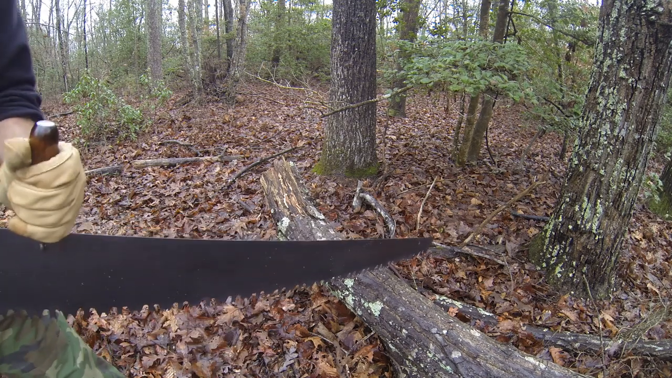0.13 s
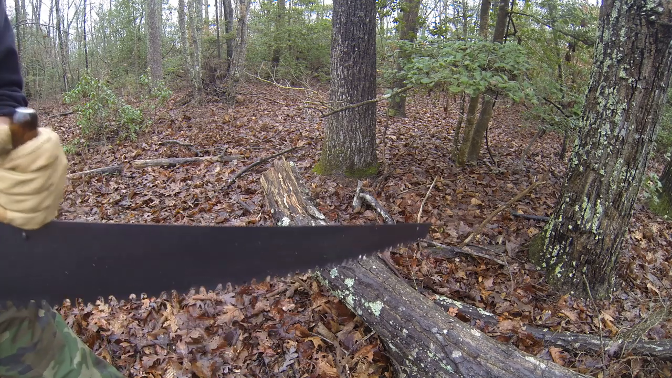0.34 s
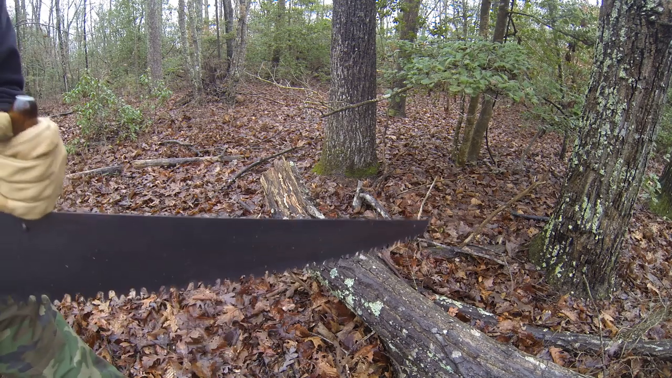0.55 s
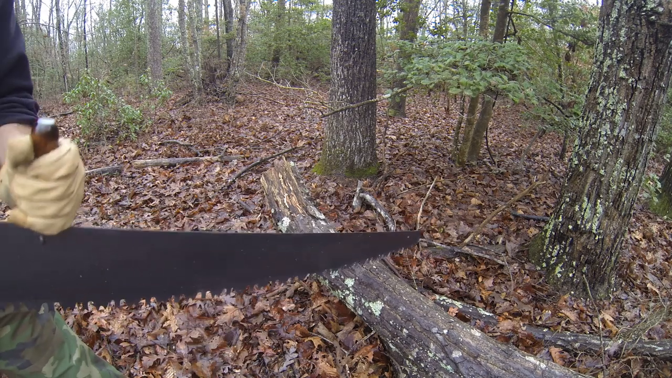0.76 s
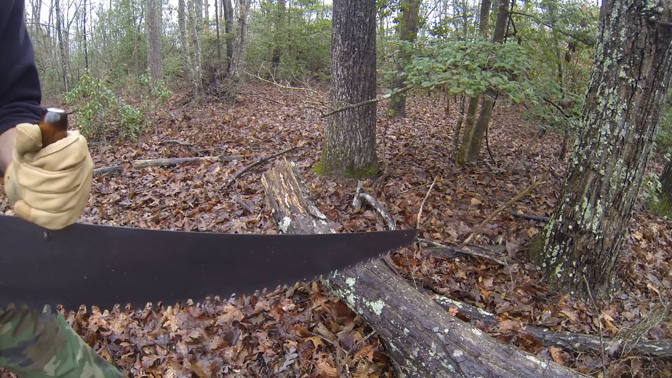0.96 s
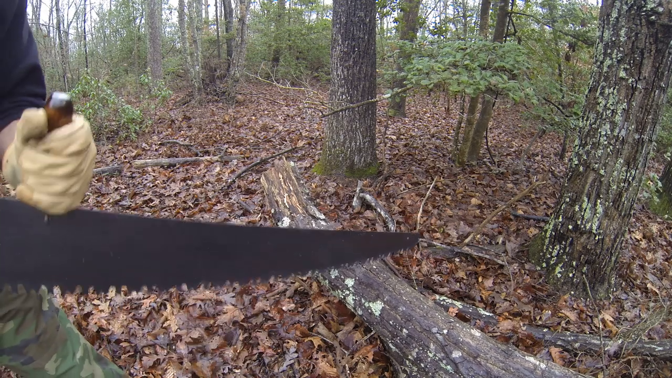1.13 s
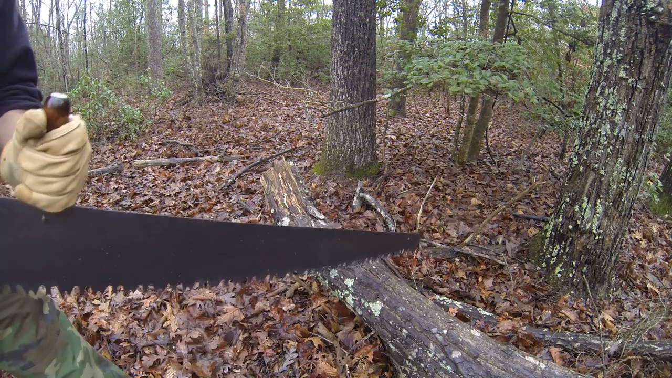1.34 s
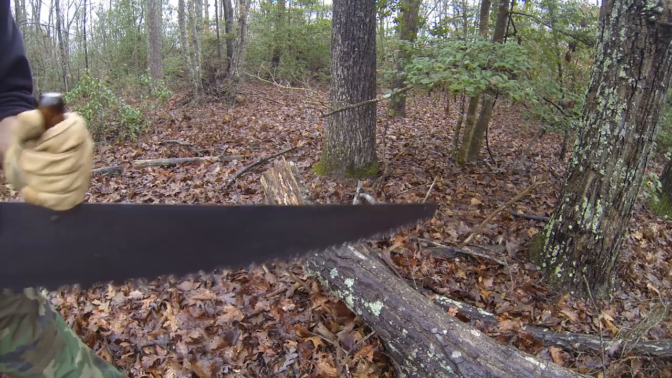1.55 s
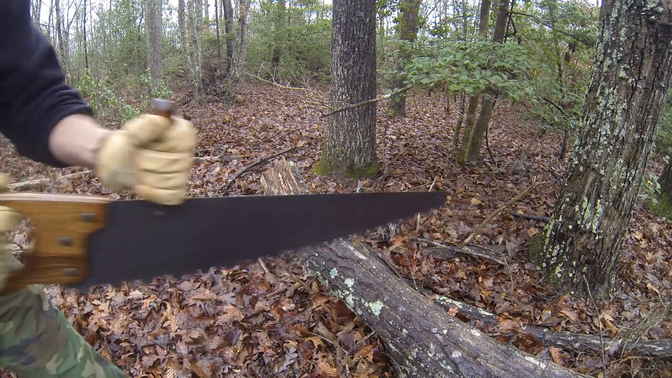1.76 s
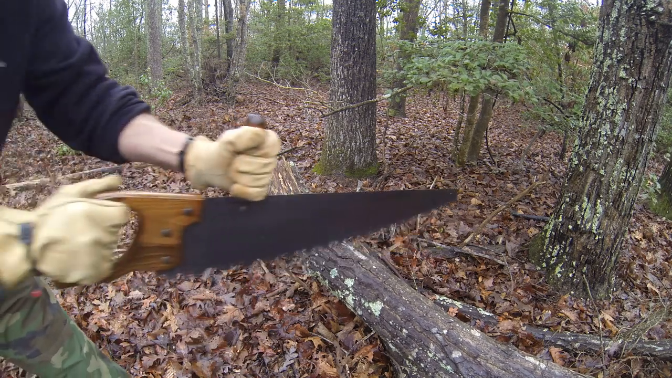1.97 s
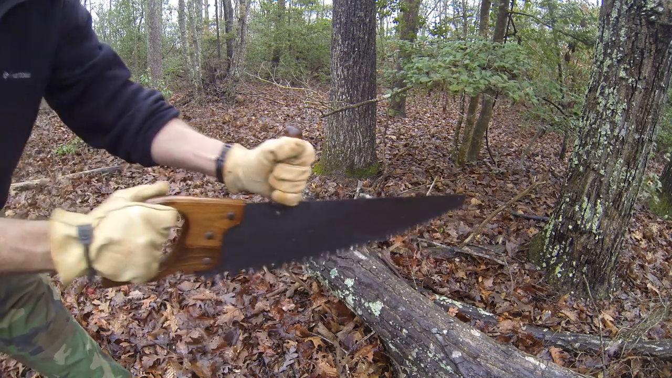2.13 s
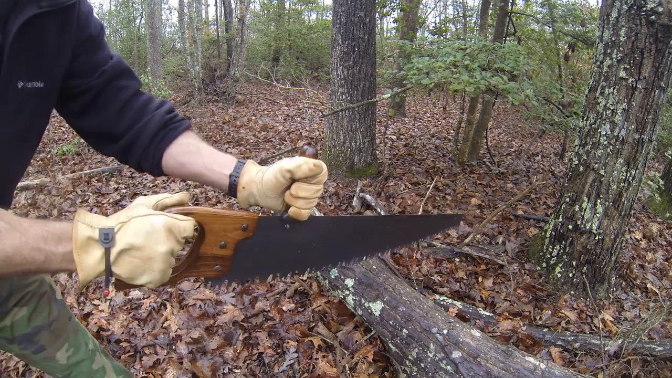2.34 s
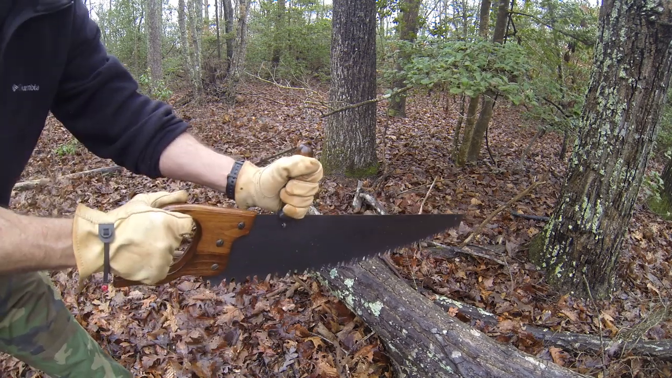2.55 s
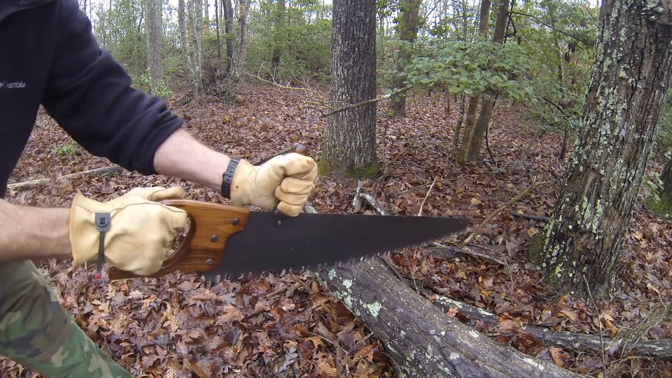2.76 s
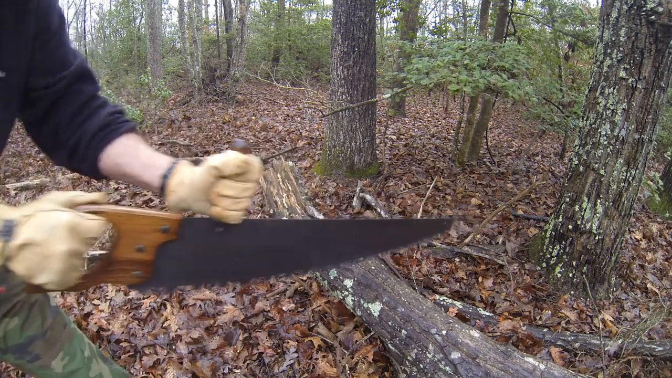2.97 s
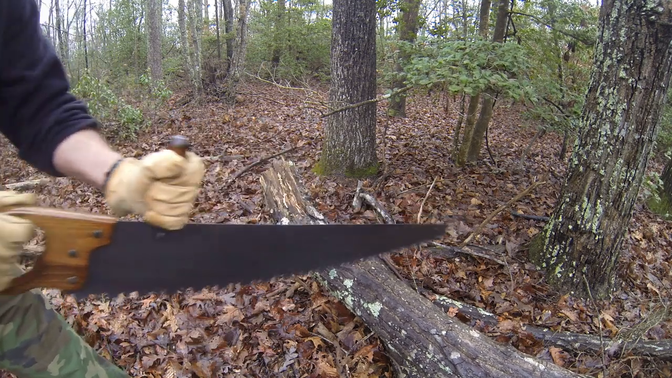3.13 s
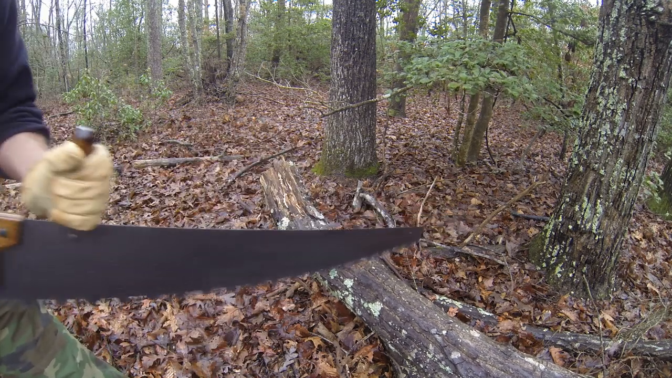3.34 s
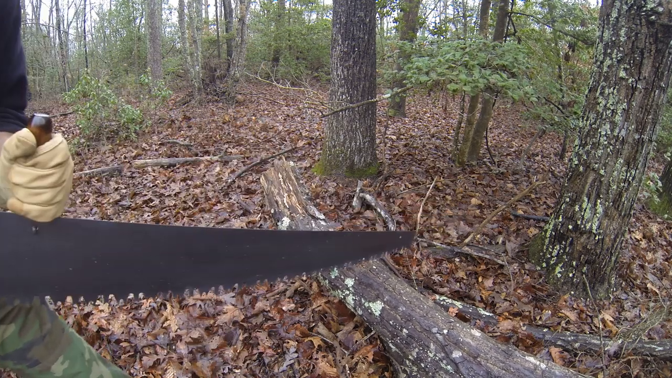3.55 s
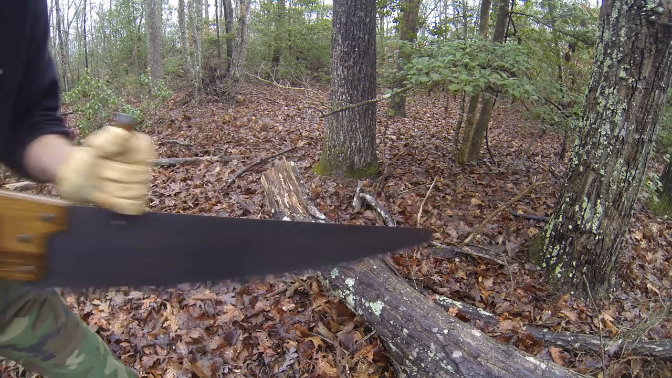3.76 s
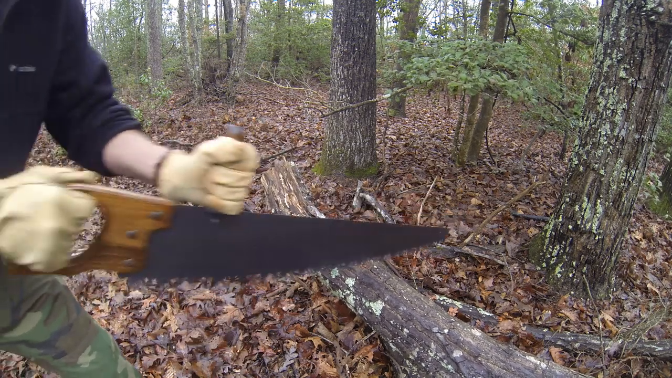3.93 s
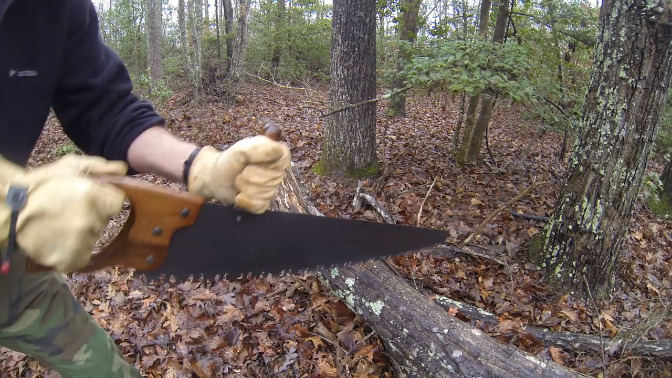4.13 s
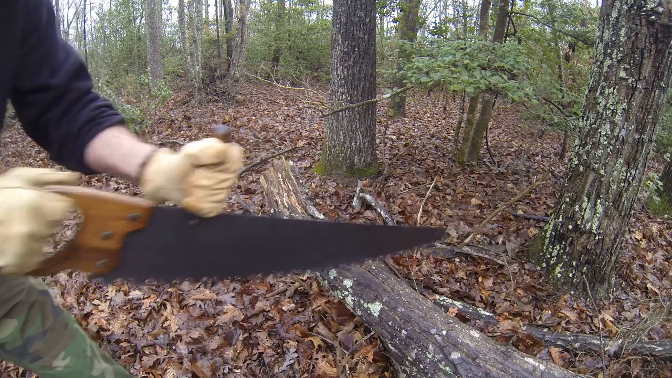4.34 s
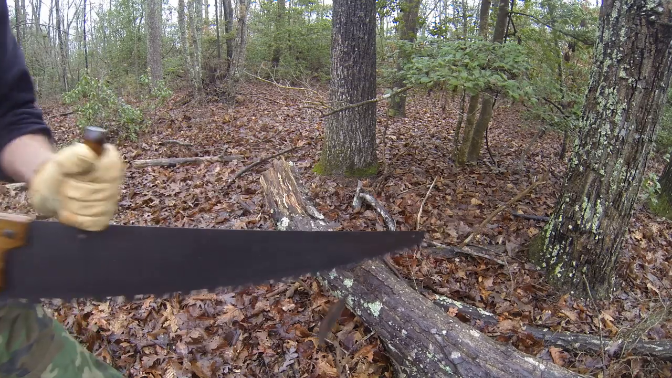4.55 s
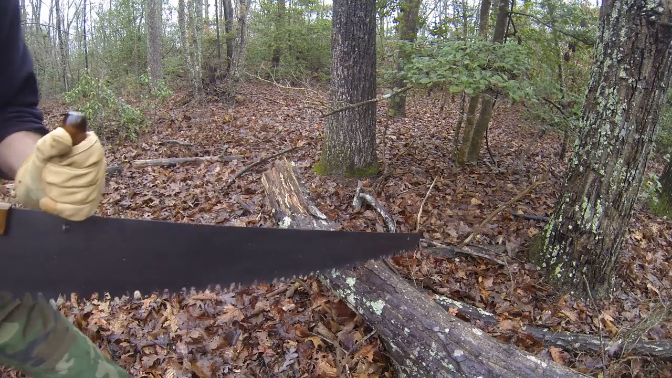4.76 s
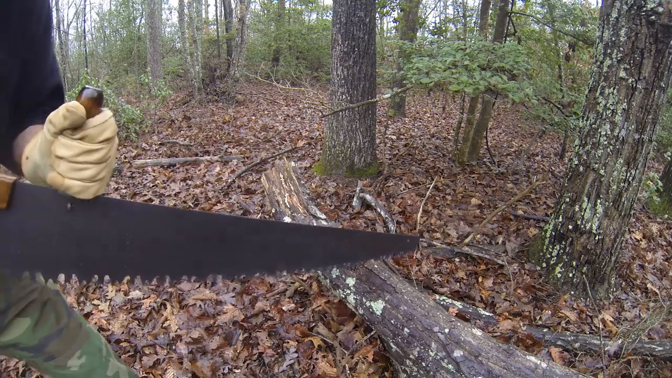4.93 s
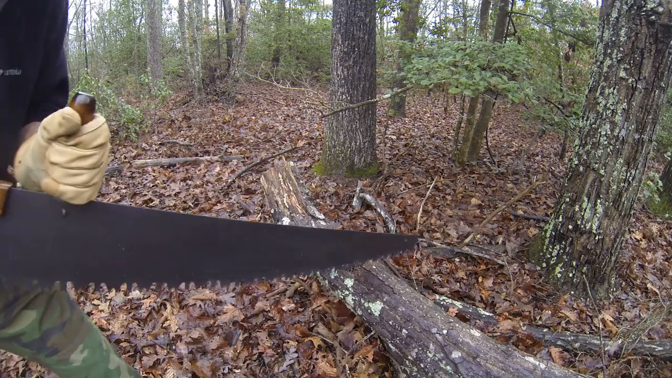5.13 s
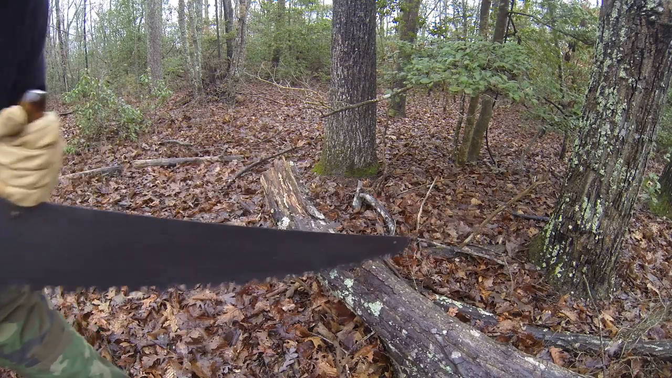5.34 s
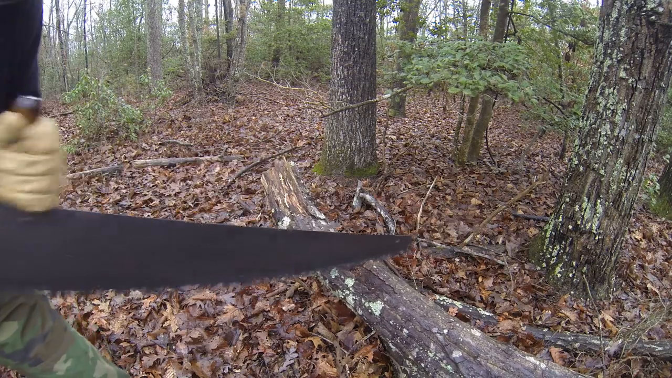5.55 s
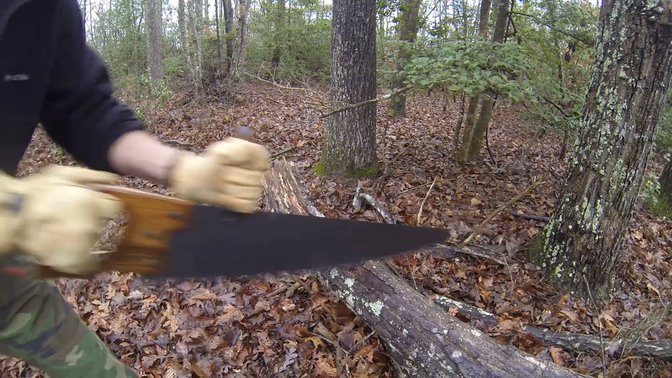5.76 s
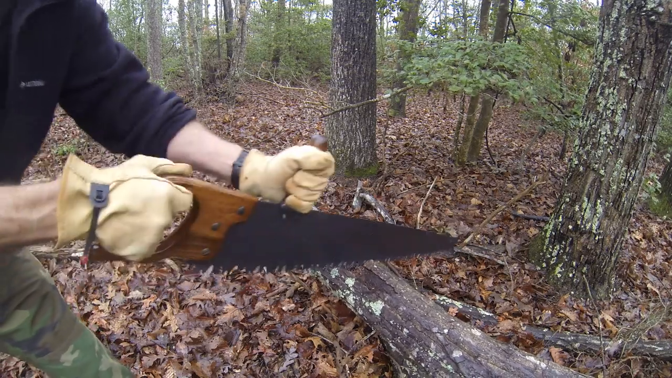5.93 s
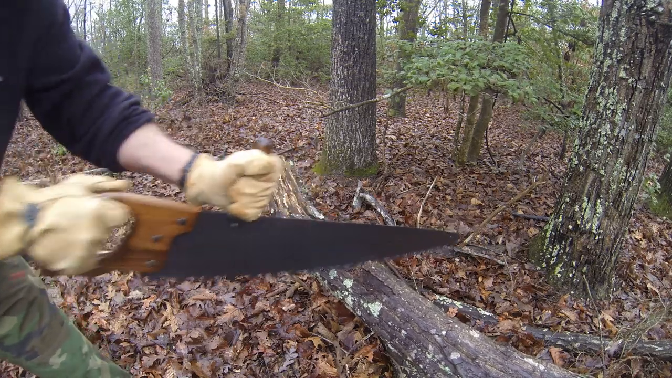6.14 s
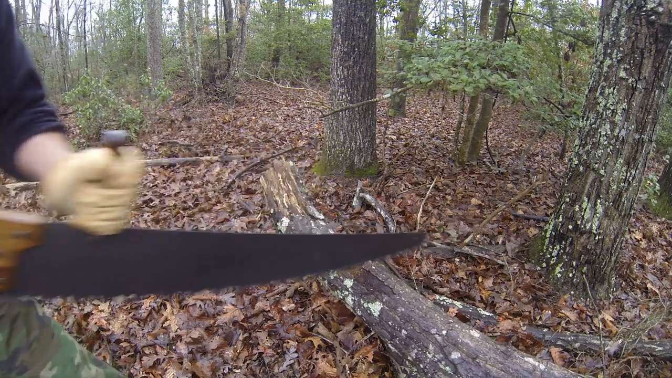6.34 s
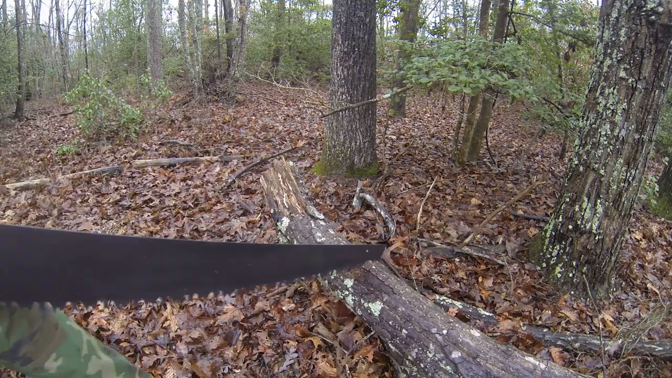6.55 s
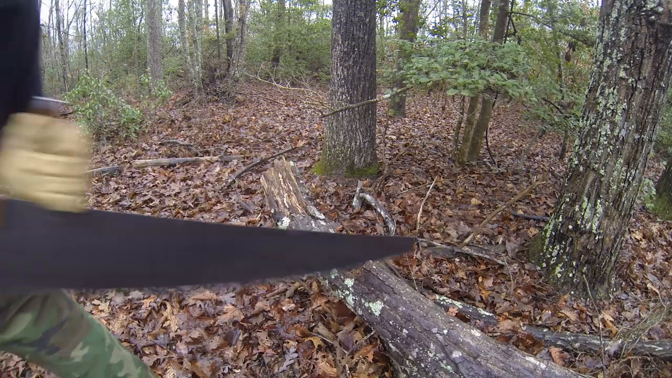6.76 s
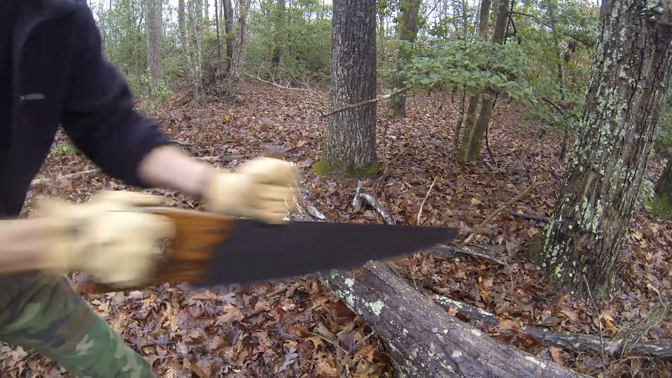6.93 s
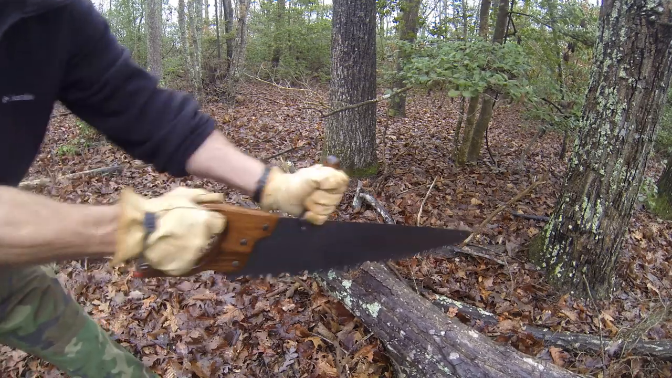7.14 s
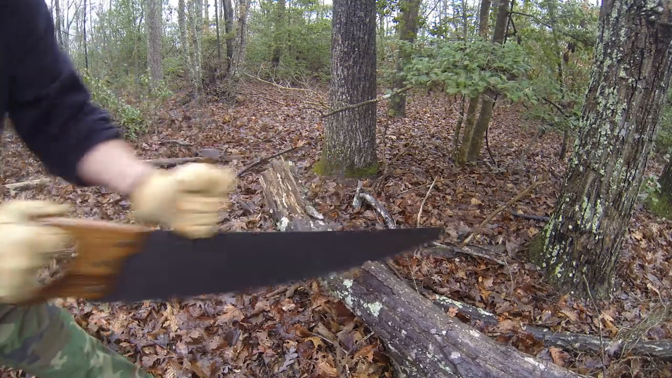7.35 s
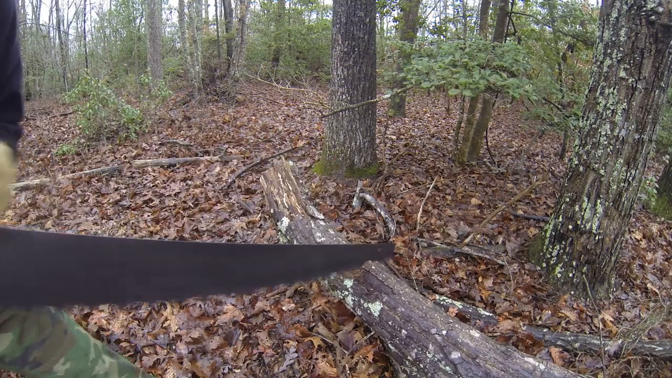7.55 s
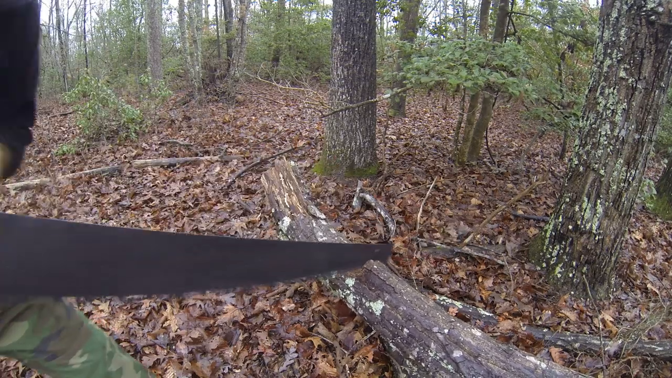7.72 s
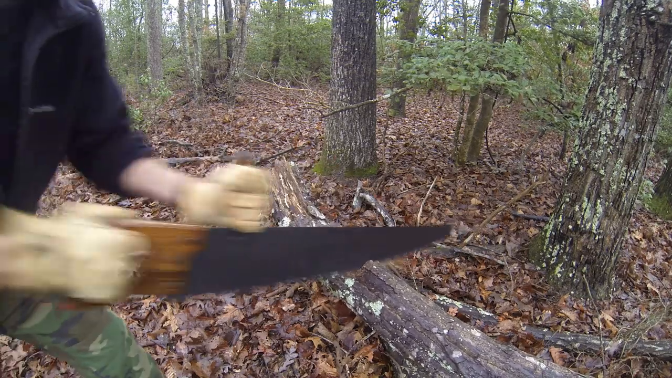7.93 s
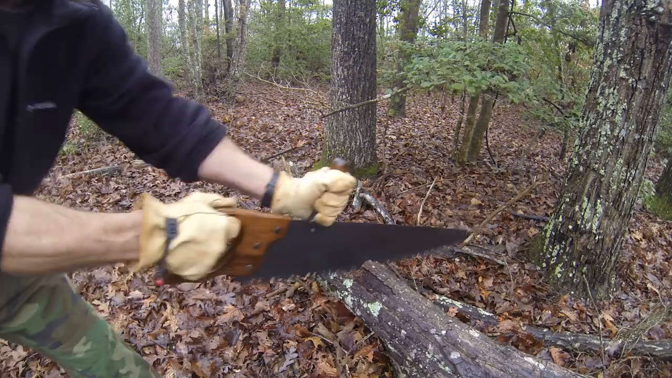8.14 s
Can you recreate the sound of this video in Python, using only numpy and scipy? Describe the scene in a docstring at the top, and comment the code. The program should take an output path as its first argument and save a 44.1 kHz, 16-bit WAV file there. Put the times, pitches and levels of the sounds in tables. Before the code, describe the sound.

Close hollow wooden rasping of a big-toothed saw, first a small tap and birds, then short strokes growing into a strong alternating rhythm.

```python
"""A two-handed crosscut saw bites into a fallen log in the woods, close to a small camera.
Teeth tear fibres in dense noise grains that ring the log, shudder it and hiss in the blade.
Now and then a tooth catches: a short burst with a thud and a crack; small dry ticks are shorter bursts.
Behind are sine-note birds, a far traffic-like rush and a low rumble that swells as the saw works.
The camera electronics leak a tone and extra hiss for part of every frame."""
import sys
import numpy as np
from scipy import signal
from scipy.fft import rfft, irfft
from scipy.io import wavfile
from scipy.ndimage import uniform_filter1d, map_coordinates

SR = 44100
rng = np.random.default_rng(int(sys.argv[2]) if len(sys.argv) > 2 else 0)


def boost_factor(decibels):
    """Convert a level in decibels to a linear amplitude factor."""
    exponent = np.asarray(decibels, float) / 20
    return 10 ** exponent


def to_wav(s):
    """Save 16-bit WAV."""
    ch = np.atleast_2d(s).T  # columns
    pcm = np.round(np.clip(ch, -1, 1) * 32767)  # PCM
    wavfile.write(sys.argv[1], SR, pcm.astype(np.int16))


N = 361179


def unit(x):
    """Scaled to rms 1."""
    return x / np.sqrt(np.mean(x ** 2) + 1e-20)


def along(points, hz):
    """Interpolates (Hz, value) points on a log frequency axis."""
    f, v = np.transpose(points)
    return np.interp(np.log(hz + 1), np.log(f + 1), v)


def curves(rows):
    """One value per sample for each column after the time."""
    s, *cols = np.transpose(rows)
    return [np.interp(np.arange(N) / SR, s, c) for c in cols]


def wobble(knots_per_s):
    """A smooth random curve."""
    knots = rng.standard_normal(int(N * knots_per_s / SR) + 4)
    return map_coordinates(knots, [np.arange(N) * knots_per_s / SR])


def coloured(x, spectrum, rings=()):
    """Causal (minimum-phase) colour with unit power gain, so that blows ring after and not before."""
    size = 4096
    hz = np.fft.rfftfreq(size, 1 / SR)
    db = along(spectrum, hz)
    db = db + sum(gain_db / (1 + (2 * (hz - centre) / width) ** 2) for centre, width, gain_db in rings)
    cepstrum = irfft(np.log(np.maximum(boost_factor(db), 1e-6)))
    # folding the cepstrum gives minimum phase
    cepstrum[1:size // 2] *= 2
    cepstrum[size // 2 + 1:] = 0
    ir = irfft(np.exp(rfft(cepstrum)))
    return signal.fftconvolve(x, ir / np.linalg.norm(ir))[:N]


def fibres(snaps_per_s, spread_db, smooth):
    """Tearing: random snaps of widely spread size over a smooth scrape (smooth = its power share)."""
    size = boost_factor(spread_db * rng.exponential(size=N))
    snaps = (rng.random(N) < snaps_per_s / SR) * size * rng.standard_normal(N)
    share = np.clip(smooth, 0, 1)
    return np.sqrt(1 - share) * unit(snaps) + np.sqrt(share) * rng.standard_normal(N)


# Colour of torn wood. Each row: frequency in Hz, relative level in dB per Hz.
LOG_COLOUR = [(220, -38.5), (380, -9), (555, 1.5), (596, -3), (649, -0.5), (725, -1.5), (823, 0),
              (1040, -3), (1360, -10.5), (1470, -5.5), (1930, -5), (2140, -10.5), (2500, -21.5),
              (3250, -37), (5500, -120)]
# Colour of the blade. Each row: frequency in Hz, relative level in dB per Hz.
BLADE_COLOUR = [(1350, -33.5), (2300, -4), (2610, -4), (3090, -1), (4220, -6.5), (4530, -11.5),
                (5450, -8.5), (5950, -14.5), (6600, -13), (7200, -18.5), (8720, -9), (10700, -17.5),
                (13000, -18), (14800, -32), (15500, -17)]
# Low shudder of the wood. Each row: frequency in Hz, relative level in dB per Hz.
SHUDDER_COLOUR = [(56, -40.5), (95, -1), (188, -3.5), (259, -1), (380, -7), (420, -6), (550, -22.5),
                  (920, -120)]
# Narrow rings of log and blade, and a microphone housing resonance near 8.5 kHz.
# Each row: centre in Hz, width in Hz, gain over the broad colour in dB.
RINGS = [(573, 22, 4), (857, 13, 3.5), (980, 89, 3), (1328, 46, 2), (1660, 69, 3.5), (1796, 42, 3),
         (1932, 21, 5.5), (2450, 30, 3.5), (2870, 18, 8), (3083, 47, 5), (3390, 28, 3), (3900, 23, 6.5),
         (4050, 42, 6), (4360, 26, 8.5), (4680, 26, 10), (5370, 250, 3), (8490, 440, 5)]


def saw():
    """Tooth groups bite unevenly; the same bite drives log, blade and the shudder of the wood."""
    (log_db, blade_db, ring_db), moving, (shudder_db, *upper_db) = strokes()
    # the shudder gains on the log as the bite eases, dB per dB
    shudder_db = shudder_db + 0.32 * (-25 - log_db)
    bite_db = 0.72 * wobble(27) + 1.23 * wobble(120)

    log_drive = moving * boost_factor(log_db + bite_db)
    log = coloured(log_drive * fibres(3000, 0.7, smooth=0.7), LOG_COLOUR, RINGS)

    rasp_db = 0.35 * bite_db + 1.72 * wobble(70) + 1.32 * wobble(32)
    blade_drive = moving * boost_factor(log_db + blade_db + rasp_db)
    blade = coloured(blade_drive * fibres(5000, 1.3, smooth=0.74), BLADE_COLOUR, RINGS)

    heave_db = 0.51 * bite_db + 1.7 * wobble(12)
    shudder_drive = moving * boost_factor(log_db + shudder_db + heave_db)
    shudder = coloured(shudder_drive * fibres(600, 0.7, smooth=0.8), SHUDDER_COLOUR)

    usual_ring_db = -9  # share of the deep ring in the log's own colour
    wandering_db = [db + 1.96 * wobble(11) for db in (ring_db - usual_ring_db, *upper_db)]
    return boost_factor(0.04) * shifting(log + blade, *wandering_db, patchy_db=2.5) + boost_factor(-2.0) * shudder


# One list per stroke, the first only a touch on the bark. Each row: time in seconds,
# drive of the log in dB, blade hiss in dB relative to it, deep ring in dB relative.
STROKES = [
    [(0.585, -67, 5, 21), (0.593, -30, -26, -8), (0.597, -29, -22, -5), (0.611, -38, -17, -1),
     (0.657, -54, -21, -6), (0.68, -65, -8, -1)],
    [(2.7, -63, -9, -12), (2.742, -54, -15, 1), (2.77, -25.5, -27, -12), (2.85, -31, -18, -12),
     (2.864, -24, -21, -23), (2.968, -30.5, -15, -7), (3.04, -23.5, -19, -15), (3.056, -31.5, -15, -10),
     (3.16, -29, -16.5, -8), (3.18, -25.5, -16.5, -18), (3.248, -34, -11.5, -10), (3.258, -23, -17, -15),
     (3.268, -30, -9.5, -7), (3.336, -29.5, -12, -6.5), (3.46, -38, -11, 0), (3.484, -54, -11, -1),
     (3.52, -54, -15, -7)],
    [(3.52, -53, -10, -12), (3.55, -57, -4, -5), (3.592, -39, -16, -5), (3.61, -38, -11, 0),
     (3.616, -31, -13, -0.5), (3.668, -23.5, -13.5, -5.5), (3.9, -28, -13.5, -9), (3.938, -35, -9, -16),
     (3.96, -34.5, -18, -13), (3.996, -56, -14, -15), (4.05, -64, -3, -13)],
    [(4.2, -55, -9, -15), (4.276, -35, -15, -3), (4.285, -30.5, -15, -9), (4.322, -26, -13.5, 0),
     (4.344, -37.5, -10, -4), (4.393, -40, -12, -14), (4.398, -26.5, -4.5, -15), (4.425, -30.5, -9.5, -9),
     (4.49, -28, -13.5, -3), (4.512, -36, -9, -6), (4.552, -31, -12, -3), (4.64, -53.5, -10, -17),
     (4.68, -62, -5, -15)],
    [(5.15, -58, -5, 0), (5.178, -56, -7, -5), (5.224, -37, -8, -4), (5.268, -42.5, -5, -8),
     (5.296, -33, -16, 6), (5.302, -42, -6, 1), (5.366, -34, -12.5, 3), (5.408, -40, -13, 0),
     (5.44, -57, -12, -7)],
    [(5.44, -54, -7, -10), (5.53, -28.5, -10, -1), (5.626, -21, -13, -5), (5.68, -17.5, -9.5, 7),
     (5.698, -28, -10.5, -7), (5.708, -21, -12.5, -12), (5.792, -27.5, -11.5, -7), (5.852, -53, -8.5, -18),
     (5.95, -55.5, -11, -15)],
    [(5.99, -47, -16, -5), (6.012, -46, -8.5, -13), (6.086, -34.5, -9.5, -2.5), (6.16, -32, -8, -7),
     (6.172, -28, -10.5, -15), (6.294, -29.5, -9, -8), (6.384, -23, -9, -8), (6.518, -28, -10.5, -2.5),
     (6.58, -51, -7, 6)],
    [(6.58, -49, -4, -3), (6.63, -30.5, -11.5, -12), (6.724, -18.5, -8, -8.5), (6.812, -18, -11, -18),
     (6.834, -20, -10.5, -6), (6.892, -16.5, -10.5, -11), (6.966, -23, -12.5, -10.5), (7.05, -55, -13, -7)],
    [(7.08, -39.5, -13, -7), (7.184, -28, -11, -13.5), (7.336, -19.5, -11, -2), (7.388, -18.5, -11.5, -7.5),
     (7.418, -20, -12.5, -3), (7.464, -22.5, -6, -9), (7.474, -18.5, -8.5, -13), (7.576, -28, -11.5, -5),
     (7.63, -46, -5, -1)],
    [(7.63, -49, -3, -3), (7.676, -34, -8, -14), (7.692, -27.5, -11.5, -14), (7.722, -20, -8.5, -8),
     (7.842, -15, -10.5, -11.5), (7.912, -15.5, -12, -16), (7.98, -20.5, -10, -10), (8.038, -39, -18, -1),
     (8.12, -49, -8, -5)],
    [(8.12, -57, -12, -8), (8.134, -47, -7, 0), (8.15, -31, -9, -5), (8.178, -24, -10.5, -16),
     (8.19, -23, -10, -12)],
]
# Colour at mid-stroke. Each row: direction, low shudder in dB, upper wood ring in dB, brightness in dB.
COLOURS = [("pull", -12, -3, -1.5), ("pull", -15, -0.37, 0.7), ("push", -10.5, -2.5, 0.089),
           ("pull", -12.5, -0.53, 1.9), ("pull", -12.5, 2.9, 2.5), ("push", -9.5, 0.28, .6),
           ("pull", -14, 2.3, 2), ("push", -10.5, -0.47, 0.95), ("pull", -17.5, 2.3, 1.2),
           ("push", -12, 1.3, 2.2), ("pull", -13.5, .6, 3)]
# Change from start to end of a stroke, as other teeth reach the kerf.
# Each entry: direction, then shudder, upper ring and brightness in dB.
DRIFT_DB = {"pull": (-4.5, 5, -6.5), "push": (-2, -9, 0.5)}


def strokes():
    """Bite, hiss and deep ring, the motion gate and the drifting colours along every stroke."""
    t = np.arange(N) / SR
    moving, colour_rows = np.zeros(N), []
    for stroke, (direction, *middle_db) in zip(STROKES, COLOURS):
        start_s, end_s = stroke[0][0], stroke[-1][0]
        moving += np.clip(np.minimum(t - start_s, end_s + 0.038 - t) / 0.024, 0, 1)
        half_drift_db = 0.5 * np.array(DRIFT_DB[direction])
        colour_rows.append((start_s, *(middle_db - half_drift_db)))
        colour_rows.append((end_s, *(middle_db + half_drift_db)))
    return curves(np.concatenate(STROKES)), np.minimum(moving, 1), curves(colour_rows)


def shifting(x, ring_db, upper_db, bright_db, patchy_db):
    """The contact point slides along blade and kerf, so the rings trade strength from moment to moment."""
    hz, t, z = signal.stft(x, SR, nperseg=1024, noverlap=768)
    at = np.clip(t * SR, 0, N - 1).astype(int)

    def band(centre_hz, width_hz):
        """Smooth weight around one frequency."""
        return 1 / (1 + (2 * (hz[:, None] - centre_hz) / width_hz) ** 4)

    def patches(bins, frames):
        """Random field smoothed over frequency and time, rms 1."""
        field = uniform_filter1d(rng.standard_normal(z.shape), size=bins, axis=0)
        return unit(uniform_filter1d(field, size=frames, axis=1))

    db = ring_db[at] * band(572, 120) + upper_db[at] * band(2120, 1030) + bright_db[at] * band(10600, 7100)
    gain = boost_factor(db + patchy_db * patches(2, 12) + 0.2 * patches(24, 4))
    # the colour moves while the total power stays
    power = np.abs(uniform_filter1d(np.abs(z) ** 2, size=5, axis=1)) + 1e-20
    gain = gain * np.sqrt(power.sum(axis=0) / (power * gain ** 2).sum(axis=0))
    return signal.istft(z * gain, SR, nperseg=1024, noverlap=768)[1][:N]


# Teeth catching and knocking. Each row: time in seconds, drive in dB, thud in dB relative to it,
# crack in dB relative, all before the trims below.
CATCHES = [(0.595, -23, -10.5, -24), (2.221, -30, -11.5, -24), (2.535, -34, -26, -25),
           (2.766, -14.5, -38, -40), (2.8, -12.5, -36, -33), (2.825, -16.5, -28, -33),
           (3.14, -13.5, -28, -34), (3.199, -10.5, -35, -24), (3.255, -14.5, -36, -20.5),
           (3.616, -17.5, -30, -26), (3.746, -13, -20, -18), (3.872, -17, -22, -34), (4.279, -20, -18, -26),
           (4.282, -14.5, -4, -28), (4.359, -15, -26, -24), (4.369, -24, -20, -20), (4.375, -9, -25, -19.5),
           (4.385, -9.5, -15.5, -33), (4.398, -13.5, -22, -10.5), (4.66, -46, -7, 3.5),
           (4.73, -16.5, -33, -22.5), (4.74, -28, -13, -14), (5.28, -30, -21, -21), (5.5, -24.5, -6.5, -19),
           (5.975, -25.5, -23, -31), (6.026, -35, -7, -8), (6.078, -28, -17, -12), (6.104, -25, -15, -1),
           (6.181, -15, -20, -20), (6.616, -23, -10, -15), (7.071, -18, -25, -35), (7.108, -26, -14, -15),
           (7.185, -14.5, -24, -16), (7.434, -11, -32, -11.5), (7.669, -20, -12, -4),
           (7.794, -6.5, -20, -14), (7.854, -10, -30, -15), (8.031, -17.5, -21, -31),
           (8.067, -23, -27, -29), (8.145, -23, -23, -12)]


def catches():
    """Each catch is a burst of tearing that dies fast, over one low push on the log."""
    burst_t60_s, thud_t60_s = 0.027, 0.012
    knock, thud, crack = np.zeros((3, N + SR))
    t = np.arange(SR // 8) / SR
    for s, db, thud_db, crack_db in CATCHES + snags():
        k = round(s * SR)
        here = slice(k, k + len(t))
        burst = np.sign(rng.standard_normal((2, len(t)))) * boost_factor(db - 60 * t / burst_t60_s)
        knock[here] += boost_factor(-5) * burst[0]
        crack[here] += boost_factor(crack_db + 1.0) * burst[1]
        thud[here] -= boost_factor(db + thud_db - 6.5 - 60 * t / thud_t60_s)
    wood = coloured(knock, LOG_COLOUR, RINGS) + coloured(thud, SHUDDER_COLOUR)
    return wood + coloured(crack, BLADE_COLOUR, RINGS)


def snags():
    """Lesser catches fall at random while the saw moves, sized by the bite of the moment."""
    snags_per_s, over_bite_db, thud_db, crack_db = 24, 4, -23.5, -20.5
    (log_db, *_), moving, _ = strokes()
    at = np.flatnonzero(rng.random(N) < moving * snags_per_s / SR)
    spread = rng.uniform(-1, 1, (len(at), 2))
    return [(k / SR, log_db[k] + over_bite_db + 3.3 * a, thud_db, crack_db + 2.5 * b)
            for k, (a, b) in zip(at, spread)]


# Small dry ticks. Each row: time in seconds, drive in dB before the trim below.
TICKS = [(4.6409, -43), (4.797, -36), (4.815, -38), (4.8279, -37), (4.8416, -30), (4.8534, -34),
         (4.8674, -38), (5.888, -34)]
# Colour of a tick. Each row: frequency in Hz, relative level in dB per Hz.
TICK_COLOUR = [(600, -40), (1300, -7), (1900, 2), (3400, -3), (5000, -16), (9000, -29), (16000, -60)]


def ticks():
    """Small dry ticks, perhaps crumbs of wood falling: very short bursts, no thud and little treble."""
    t60_s = 0.011
    out, t = np.zeros(N + SR), np.arange(SR // 20) / SR
    for s, db in TICKS:
        burst = np.sign(rng.standard_normal(len(t))) * boost_factor(db - 3.5 - 60 * t / t60_s)
        out[round(s * SR):][:len(t)] += burst
    return coloured(out, TICK_COLOUR)


# Bird notes, each a part of one arch of pitch. Each row: start in seconds, length in seconds,
# top reached after seconds, foot in Hz, top in Hz, rms level at the foot in dB before flutter.
BIRDS = [(.42, .07, 0.031, 2820, 2910, -64), (1.335, .03, .002, 1700, 2400, -50),
         (1.448, .03, .002, 1700, 2200, -55), (1.503, .04, .002, 1496, 1850, -53),
         (1.725, .032, .002, 1400, 1950, -55), (1.502, .12, .03, 3980, 4090, -70),
         (1.68, .12, .05, 4040, 4070, -75), (2.156, .079, .052, 5200, 7550, -61),
         (2.282, .068, 0.063, 4900, 7430, -54.5), (2.373, .03, .002, 8200, 8600, -67),
         (2.401, .05, .026, 4900, 6400, -52.5), (2.53, .08, 0.022, 4230, 4320, -73),
         (5.905, .035, .034, 5045, 6750, -59)]


def birds():
    """Thin sine notes with soft ends and a diffuse echo off the trees."""
    arch_power, high_loss_db_per_khz = 0.55, 6.5  # roundness of the arch; the top of a note is fainter
    ramp_s, echo_t60_s = 0.0031, 0.25
    t, out = np.arange(N) / SR, np.zeros(N)
    waver, flutter_db = 1 + 0.0111 * wobble(110), 3 * wobble(40.1)
    for s, length, top_s, foot_hz, top_hz, db in BIRDS:
        off_top = np.clip((t - s - top_s) / max(top_s, length - top_s), -1, 1)
        lift_hz = (top_hz - foot_hz) * (1 - off_top ** 2) ** arch_power
        ends = np.clip(np.minimum(t - s, s + length - t) / ramp_s, 0, 1)
        level = np.sqrt(2) * boost_factor(db - high_loss_db_per_khz * lift_hz / 1000 + flutter_db)
        phase = 2 * np.pi * np.cumsum((foot_hz + lift_hz) * waver) / SR
        out += ends * level * np.sin(phase)
    echo_t = np.arange(SR // 4) / SR
    tail = rng.standard_normal(SR // 4) * boost_factor(-60 * echo_t / echo_t60_s)
    return out + boost_factor(-5) * signal.fftconvolve(out, tail / np.linalg.norm(tail))[:N]


# Broad colour of the rumble. Each row: frequency in Hz, relative level in dB per Hz.
RUMBLE_COLOUR = [(8.8, -45), (15, 2.5), (32, 5), (92, -5), (133, -11.5), (147, -13.5), (220, -34),
                 (290, -47), (480, -120)]
# Bands of the rumble. Each row: centre in Hz, width in Hz, gain in dB.
RUMBLE_BANDS = [(41.5, 8.4, 2), (61.7, 22, -1), (88, 11, 4.5)]
# Rumble level. Each row: time in seconds, level in dB.
RUMBLE_LEVEL = [(0.0, -46.5), (0.57, -45.5), (0.59, -37), (0.84, -44.5), (2.64, -43.5), (2.71, -38),
                (3.6, -41), (3.7, -35), (4.15, -45), (4.31, -39), (4.88, -43), (5.84, -34), (5.91, -39.5),
                (7.02, -35), (7.14, -39), (7.34, -35.5), (7.98, -32), (8.19, -41)]
# Colour of the far rush. Each row: frequency in Hz, relative level in dB per Hz.
RUSH_COLOUR = [(110, -26), (180, -1.5), (286, -4), (472, -2), (523, -4), (939, -3.5), (1490, -11),
               (1840, -3), (2500, -10), (3130, -10.5), (3720, -20), (4120, -20.5), (4570, -23.5),
               (9750, -34.5), (11000, -36), (14300, -65.5), (22000, -120)]
# Rush level. Each row: time in seconds, level in dB.
RUSH_LEVEL = [(0, -52.5), (2.2, -51), (2.6, -49.5), (4.1, -50.5), (5.1, -50.5), (7.05, -50.5),
              (8.19, -44.5)]


def rumble_and_rush():
    """Coloured noise: a low rumble, partly handling shake, swelling as the saw works; a far, patchy rush."""
    (rumble_db,), (rush_db,) = curves(RUMBLE_LEVEL), curves(RUSH_LEVEL)
    low = coloured(rng.standard_normal(N), RUMBLE_COLOUR, RUMBLE_BANDS)
    # fast fluctuation evened out; the rumble follows its level table
    envelope = np.sqrt(np.abs(uniform_filter1d(low ** 2, size=6000)) + 1e-9)
    rumble = boost_factor(rumble_db + 1.1 * wobble(5)) * low / envelope
    patchy_db = 0.71 * wobble(2.83) + 0.51 * wobble(39)
    rush = boost_factor(rush_db + patchy_db) * coloured(fibres(1500, 1.4, smooth=0.83), RUSH_COLOUR)
    return rumble + rush


# Colour of the read-out hiss. Each row: frequency in Hz, relative level in dB per Hz.
READOUT_COLOUR = [(7000, -16), (8200, 3.5), (9900, -15), (11200, -0.5), (13000, -3.5), (15200, -4),
                  (15600, -32)]


def electronics():
    """Sensor read-out leaks a tone and raises the hiss for part of every frame."""
    frame_hz, tone_hz = 24000 / 1001, 13644
    t = np.arange(N) / SR
    frame_phase = ((t - 0.023) * frame_hz) % 1
    on = uniform_filter1d(1.0 * (frame_phase < 0.66), size=60)
    tone = on * boost_factor(-72) * np.sin(2 * np.pi * tone_hz * t)
    hiss = coloured(rng.standard_normal(N), READOUT_COLOUR)
    return tone + boost_factor(-79.5 + 8 * on) * hiss


def scene():
    """Saw in front; birds, rumble and rush behind."""
    return (saw() + catches() + ticks() + birds() + rumble_and_rush())[None]


def roll_off(x):
    """The treble ends steeply here."""
    return signal.sosfilt(signal.butter(12, 15750, fs=SR, output="sos"), x)


def record(dry):
    """The camera adds its own whine and cuts steeply above its band limit."""
    top_hz = 15200
    band_limit = signal.ellip(8, 0.5, 50, top_hz, fs=SR, output="sos")
    mix = signal.sosfilt(band_limit, dry + electronics())
    return roll_off(mix)


dry = scene()
out = record(dry)
to_wav(out)
```